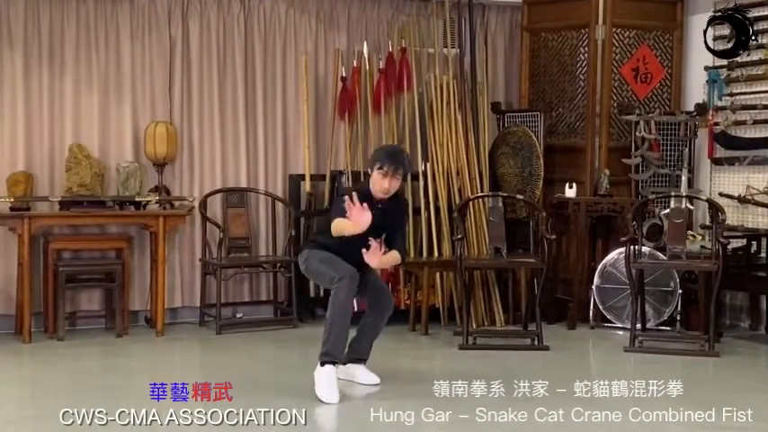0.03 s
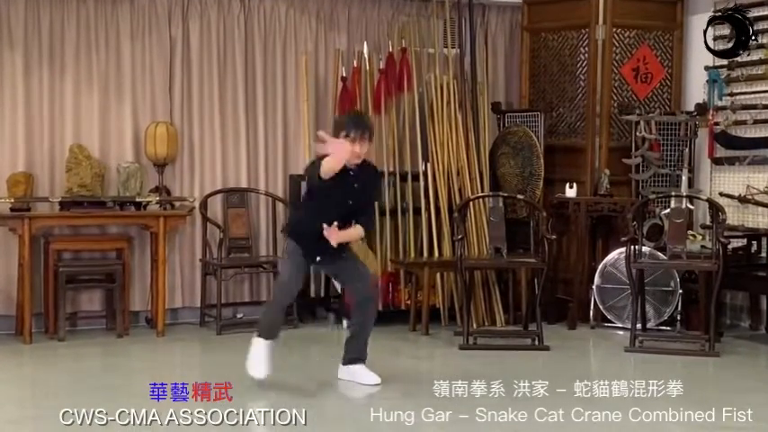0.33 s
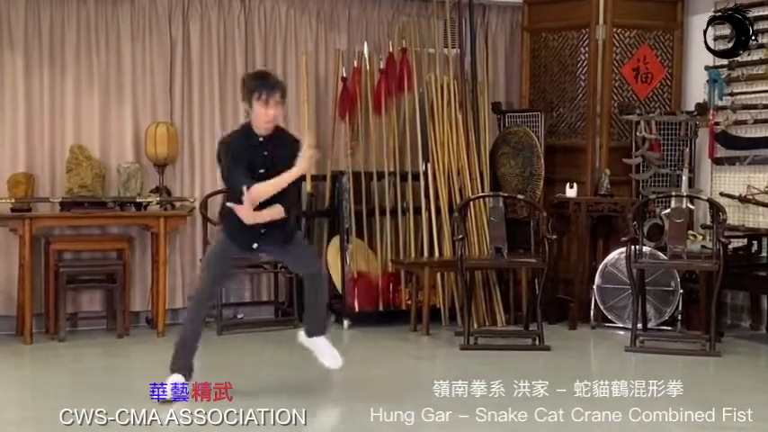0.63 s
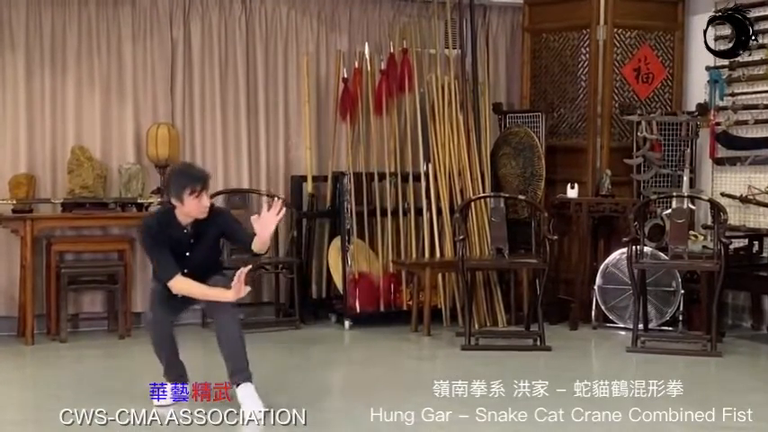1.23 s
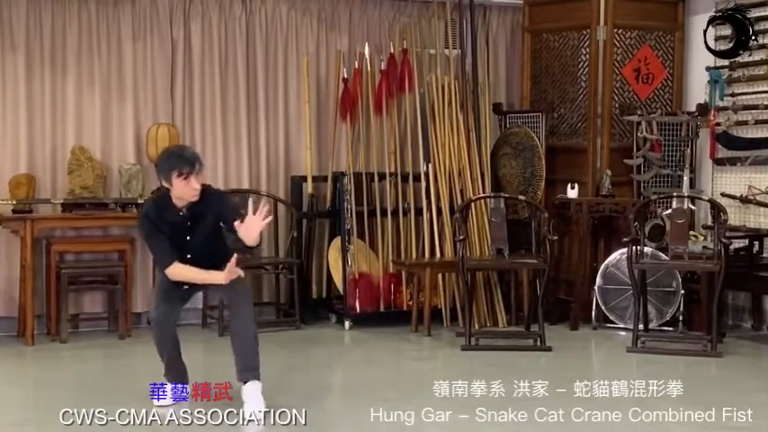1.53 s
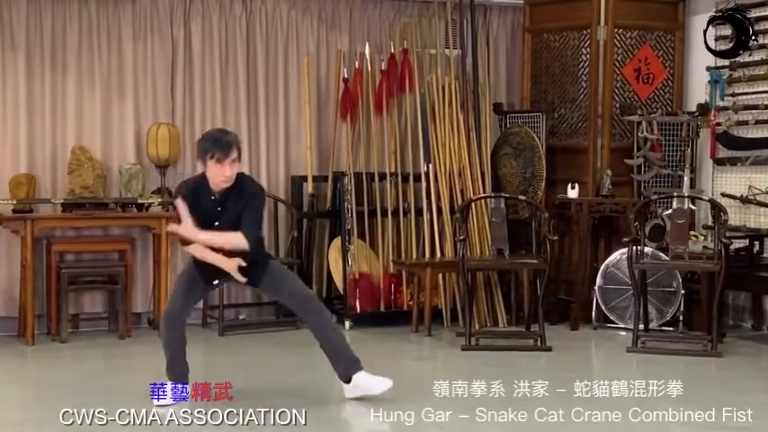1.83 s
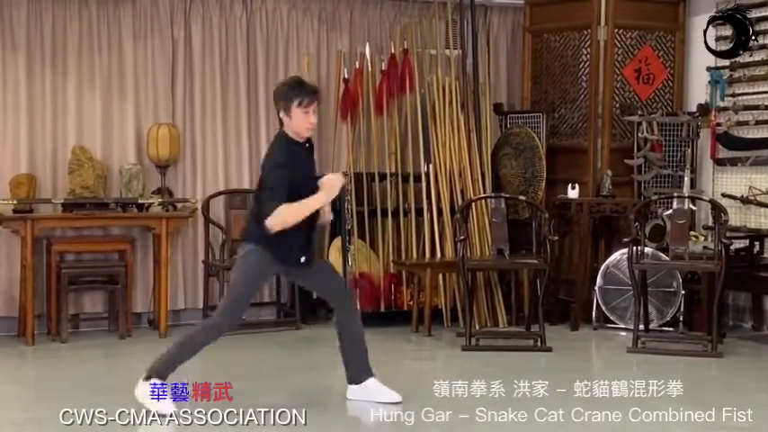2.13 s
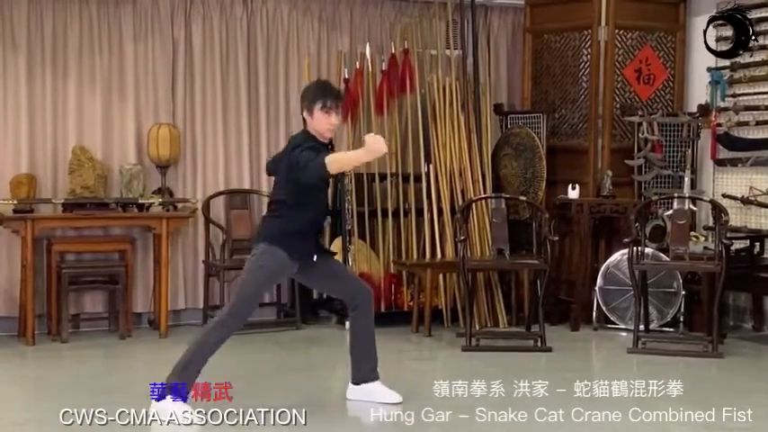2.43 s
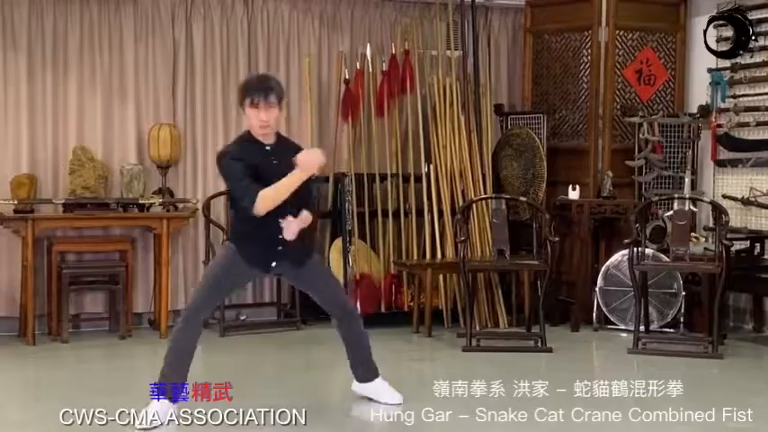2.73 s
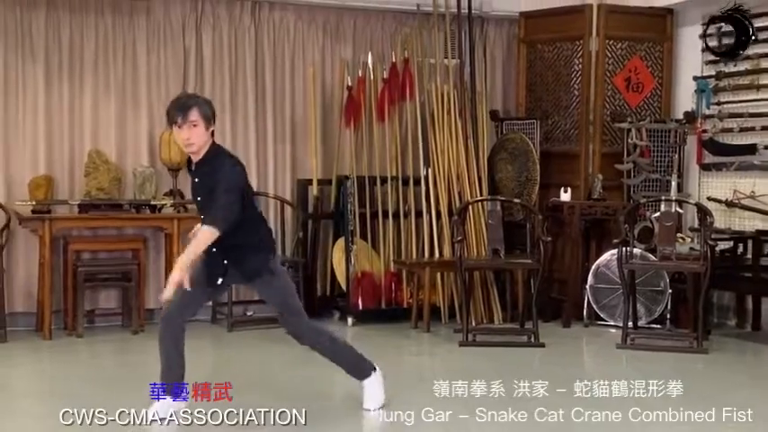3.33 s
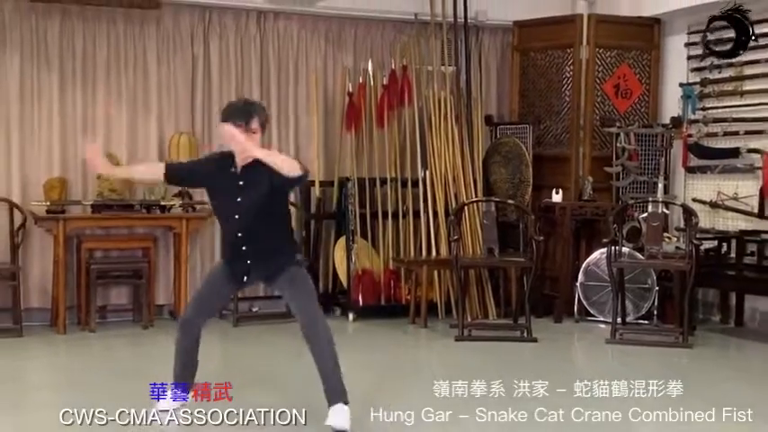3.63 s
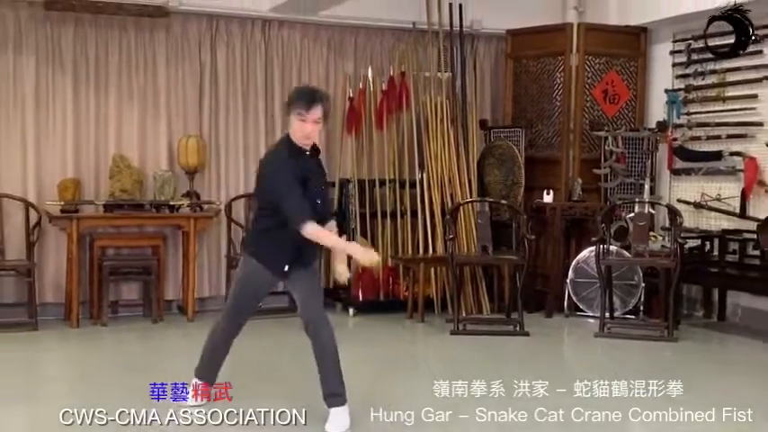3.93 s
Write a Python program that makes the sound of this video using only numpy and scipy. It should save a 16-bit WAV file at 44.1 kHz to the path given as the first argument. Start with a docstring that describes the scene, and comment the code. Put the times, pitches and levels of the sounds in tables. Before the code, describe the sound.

Two heavy stomps ring through a hall amid soft shoe scuffs and sleeve swishes.

```python
"""Martial arts stances in a live hall

Soft shoes tap, scuff and shuffle on a hard floor a few metres away; sleeves swish.
Two flat-footed stomps, each a cluster of sharp hits, ring floor and room.
Ventilation hums underneath. Shortly before the second stomp the whole sound steps up in level."""
import sys
import numpy as np
from scipy import signal
from scipy.fft import rfft, irfft
from scipy.io import wavfile

SR = 44100
rng = np.random.default_rng(int(sys.argv[2]) if len(sys.argv) > 2 else 0)


def output_pcm(signal):
    """Save a mono or channel-first signal as 16-bit PCM at the path in sys.argv[1].

    Samples are clipped to [-1, 1] before scaling.
    """
    pcm = np.clip(np.atleast_2d(signal).T, -1, 1) * 32767
    wavfile.write(sys.argv[1], SR, np.round(pcm).astype(np.int16))


N = 176400
T = np.arange(N) / SR
HZ = np.maximum(np.arange(N // 2 + 1) * SR / N, 1)

# rushing air (frequency [Hz], level [dB])
AIR_SPECTRUM = [(20, -51), (32, -21), (45, 7), (65, -3.5), (90, 3.5), (150, 1.5), (280, 0.5), (420, -9),
                (750, -11.5), (1100, -18.5), (1500, -23.5), (2500, -28), (5700, -34), (6600, -43),
                (15500, -55.5)]
# hum, then fan tones (frequency [Hz], level [dB], waver [dB])
FAN_TONES = [(68.55, -53.5, 0.7), (101.8, -67, 0.5), (147, -69, 2.5), (670.6, -76, 1.5), (786, -74, 0.5)]
# swell of the hum (time [s], gain [dB])
HUM_ENVELOPE = [(0, -4), (.13, 2.5), (.45, -6.5), (.76, 3.5), (1.03, 1.5), (1.31, -7), (1.55, -0.5),
                (1.8, 2), (2.25, 0.5), (2.62, 0.5), (2.9, 1), (3.28, -2.5), (3.6, -1.5), (3.88, 1.5),
                (4, -4)]
# sleeve swishes (peak time [s], rise [s], fall [s], level [dB])
SLEEVE_MOVES = [(.43, 0.15, .08, -80), (.7, 0.11, 0.11, -80), (1.7, 0.027, .05, -77),
                (1.85, 0.086, 0.16, -78), (2.53, 0.13, 0.054, -81), (2.665, 0.12, 0.033, -69.5),
                (3.17, 0.21, 0.073, -83.5), (3.69, 0.069, 0.095, -67.5), (3.79, 0.066, 0.062, -70)]
# cloth friction (frequency [Hz], level [dB])
CLOTH_SPECTRUM = [(100, -10), (500, -6), (1500, -2), (3000, 2.5), (5000, 1), (7000, -1), (9000, -5.5),
                  (11000, -2), (15500, -16)]
# sole scuffs (peak time [s], rise [s], fall [s], level [dB], rasp [Hz])
SOLE_SLIDES = [(.41, 0.042, 0.014, -68, 2600), (.492, 0.016, 0.02, -63, 1400),
               (1.82, 0.018, 0.033, -70, 2700), (2.585, 0.016, 0.024, -57.5, 3130),
               (2.67, 0.065, 0.026, -60.5, 1590), (2.779, 0.048, 0.032, -46.5, 2000),
               (3.09, 0.072, 0.067, -69, 1530), (3.445, 0.0088, .02, -66.5, 2030),
               (3.58, 0.03, 0.035, -73, 1200), (3.76, 0.062, 0.097, -64.5, 1440)]
# sole friction (frequency [Hz], level [dB])
SCUFF_SPECTRUM = [(100, 12), (400, 7), (1000, 3), (1400, 9.5), (3000, 2), (4500, -3.5), (8000, -31),
                  (15000, -40)]
# shuffles (peak time [s], rise [s], fall [s], level [dB])
WEIGHT_SHIFTS = [(.5, 0.089, 0.034, -56.5), (.88, 0.13, 0.1, -66), (1.8, 0.19, 0.083, -61),
                 (2.5, 0.12, 0.082, -55), (3.69, 0.16, 0.13, -58.5)]
# dull friction (frequency [Hz], level [dB])
SHUFFLE_SPECTRUM = [(50, -8), (120, 0.5), (260, 5.5), (420, -4), (700, -1), (1200, -14), (2000, -19.5),
                    (5000, -42), (15500, -52)]
# light steps (time [s], level [dB], bass [dB], treble [dB])
FOOTFALLS = [(0.477, -22, 8, -3), (.775, -23, -4, -6.5), (1.662, -25, -8, -4.5), (1.705, -21, 6, -17),
             (1.802, -18, -1.5, -6), (2.925, -17, 11.5, -24), (3.434, -23.5, 5.5, -3.5),
             (3.527, -21.5, -9, -5.5)]
# soft tap (frequency [Hz], level [dB])
TAP_SPECTRUM = [(40, -18.5), (120, 1), (280, 4.5), (500, -0.5), (900, -6.5), (1400, -8.5), (2100, -16),
                (3200, -26.5), (5000, -28), (9000, -39), (15500, -39)]
# sharp hits within the stomps: sole impacts, their quick echoes and a closing snap
# (time [s], level [dB], thump [dB], clap [Hz], clap [dB], crack [dB], slap [dB], snap [dB])
STOMP_HITS = [(1.9884, 2, -0.5, 1220, 6, -7.5, 3, 7.5), (2.0003, -11, -2, 3040, 7, 4.5, -1, 3),
              (2.7187, -16, 3.5, 960, 2, 7, 0, -6), (2.7333, -4, -2, 990, 5.5, -1, 6.5, -14),
              (2.7531, -16, 4.5, 900, 3, 1, 5, -18), (2.7654, -9.5, 8, 670, 2.5, 2, -6, -17),
              (2.791, -25, 7, 2400, 7.5, 13, 0.5, -12)]
# base spectrum of a hit (frequency [Hz], level [dB])
STOMP_SPECTRUM = [(30, -28), (60, -9.5), (120, 2), (220, -0.5), (480, -1), (750, -3.5), (1100, -9),
                  (1480, -16), (2000, -14.5), (2600, -16.5), (3400, -24), (4500, -28.5), (6500, -32),
                  (9000, -37), (15500, -42.5)]
# stomp landings (time [s])
LANDING_TIMES_S = [1.99, 2.736]
# floor and room modes (frequency [Hz], T60 [s], first landing [dB], second landing [dB])
ROOM_MODES = [(117.9, 0.87, 2, -2), (145, 0.45, -13, -19), (197, 0.97, -23, -1), (219.3, 0.53, -12, -0.5),
              (242, 1, -2, -23), (359, 0.51, -23, -2), (429, 0.31, -28, -5), (487, 0.33, -2, -3),
              (577, 0.64, -10, -7), (624, 1, -5, -7.5), (765, 0.28, -23, -13), (889, 0.45, -9, -6),
              (990, 0.38, -24, -6.5), (1150, 0.74, -3, -14)]
# first reflections (left delay [s], right delay [s], gain [dB])
REFLECTIONS = [(.0051, .0053, -6), (.0098, .0108, -3.5), (0.012, .0124, -13.5), (0.027, 0.036, -24)]
# hall decay (frequency [Hz], T60 [s])
HALL_DECAY = [(60, 1.2), (170, 1.05), (400, 0.86), (1000, 0.92), (6000, 0.93), (14000, 0.51)]
# diffuse field (frequency [Hz], left-right coherence [0-1])
COHERENCE = [(70, 0.95), (170, 0.87), (350, 0.71), (700, 0), (12000, 0.029)]
# stereo balance (frequency [Hz], left minus right [dB])
STEREO_TILT = [(60, -0.5), (140, -2), (300, -0.8), (600, -0.5), (1100, 1.8), (2200, 1), (4500, 4.5),
               (8000, 0), (14000, 0)]

IMPACT_DB, HALL_BUILD_S = 15, 0.0017
SIDES = np.array([[1], [-1]])  # left, right


def undb(db):
    """Decibels to gain."""
    return 10 ** (np.asarray(db) / 20)


def curve(points, hz=HZ):
    """Interpolate (frequency [Hz], value) points over log frequency."""
    points_hz, values = np.array(points).T
    return np.interp(np.log(hz), np.log(points_hz), values)


def above(hz):
    """Smooth shelf: 0 below hz, 1 above."""
    return 1 - 1 / (1 + (HZ / hz) ** 2)


def bump(hz, log_width):
    """Bell of height 1 over log frequency."""
    return np.exp(-(np.log(HZ / hz) / log_width) ** 2)


def decay(t60_s):
    """Envelope falling 60 dB in t60_s."""
    return np.exp(-np.log(1000) * T / t60_s)


def wander(rate_hz):
    """Smooth random drift, unit spread."""
    drift = irfft(rfft(rng.standard_normal(N)) / (1 + (HZ / rate_hz) ** 2) ** 2, N)
    return drift / drift.std()


def pulse(spectrum_db):
    """Minimum-phase pulse with the given spectrum."""
    cepstrum = irfft(np.log(undb(spectrum_db)), N)
    cepstrum[1:N // 2] *= 2
    cepstrum[N // 2 + 1:] = 0
    return irfft(np.exp(rfft(cepstrum)), N)


def add(out, start_s, sound):
    """Mix sound into out at start_s."""
    i = int(start_s * SR)
    out[i:] += sound[:N - i]


def diffuse():
    """Stereo spectra of noise from all round: alike in the bass, unrelated in the treble."""
    coherence = curve(COHERENCE)
    mid, side = rfft(rng.standard_normal((2, N)))
    return mid * np.sqrt((1 + coherence) / 2) + SIDES * side * np.sqrt((1 - coherence) / 2)


def ventilation(air_db=-55.5, flicker_db=0.36, left_lag_s=0.00034, waver_hz=14):
    """Swelling hum and faint fan tones over rushing air, part of it straight from the right."""
    lag_s = np.array([[left_lag_s], [0]])
    direct = rfft(rng.standard_normal(N)) * np.exp(-2j * np.pi * HZ * lag_s)
    air = irfft((diffuse() + undb(-14) * direct) * undb(curve(AIR_SPECTRUM)), N)
    air *= undb(air_db + flicker_db * wander(rate_hz=11)) / air.std()
    tones = []
    for hz, db, waver_db in FAN_TONES:
        amplitude = np.sqrt(2) * undb(db + waver_db * wander(waver_hz))
        tones.append(amplitude * np.sin(2 * np.pi * hz * T + 0.44 * wander(waver_hz)))
    swell = undb(np.interp(T, *np.array(HUM_ENVELOPE).T))
    return air + tones[0] * swell + sum(tones[1:])


def friction(moves, spectrum_db, rough_db=2, rough_hz=51):
    """Grainy rubbing noise that swells and fades with each move."""
    power = 0
    for peak_s, rise_s, fall_s, db in moves:
        width_s = np.where(T < peak_s, rise_s, fall_s)
        power += (undb(db) * np.exp(-((T - peak_s) / width_s) ** 2)) ** 2
    noise = irfft(rfft(rng.standard_normal(N)) * undb(spectrum_db), N)
    grain = undb(rough_db * wander(rough_hz))
    return np.sqrt(power) * grain * noise / noise.std()


def swishes():
    """Sleeve cloth rubs with a bright hiss."""
    return friction(SLEEVE_MOVES, curve(CLOTH_SPECTRUM))


def scuffs(rasp_db=5.5):
    """Each slide of a sole rasps at its own pitch."""
    return sum(friction([move], curve(SCUFF_SPECTRUM) + rasp_db * bump(rasp_hz, log_width=0.28))
               for *move, rasp_hz in SOLE_SLIDES)


def shuffles():
    """Soles rub dully as the weight shifts."""
    return friction(WEIGHT_SHIFTS, curve(SHUFFLE_SPECTRUM))


def steps(grit_share=0.9, grit_decay_s=0.009):
    """Soft taps spread by tiny grit contacts under the sole; weight on the heel adds bass."""
    out = np.zeros(N)
    for start_s, db, bass_db, treble_db in FOOTFALLS:
        tap = pulse(curve(TAP_SPECTRUM) + bass_db * (1 - above(200)) + treble_db * above(510))
        grit = np.exp(-T / grit_decay_s) * rng.standard_normal(N)
        grit /= np.linalg.norm(grit)
        contact = np.sqrt(1 - grit_share) + np.sqrt(grit_share) * rfft(grit)
        add(out, start_s, undb(db + IMPACT_DB) * irfft(rfft(tap) * contact, N))
    return floor_flex(out)


def floor_flex(impacts, centre_hz=500, width_hz=710):
    """The floor gives and swings back: an all-pass that slightly delays the low mids."""
    s = 1j * HZ
    poles = s * s + width_hz * s + centre_hz ** 2
    return -irfft(rfft(impacts) * np.conj(poles) / poles, N)


def stomps():
    """Sole impacts, their quick echoes and a closing snap, each a sharp pulse of its own colour."""
    out = np.zeros(N)
    for start_s, db, thump_db, clap_hz, clap_db, crack_db, slap_db, snap_db in STOMP_HITS:
        spectrum_db = (curve(STOMP_SPECTRUM)
                       + thump_db * (1 - above(190))
                       + clap_db * bump(clap_hz, log_width=0.2)
                       + crack_db * above(2150)
                       + slap_db * bump(5240, log_width=0.55)
                       + snap_db * above(11000))
        add(out, start_s, undb(db + IMPACT_DB) * pulse(spectrum_db))
    return floor_flex(out)


def ringing(gain_db=-41.5):
    """Both landings ring the same floor and room modes, weighted by where the foot falls."""
    out = np.zeros(N)
    for hz, t60_s, *levels_db in ROOM_MODES:
        envelope = decay(t60_s) * (1 - np.exp(-T / HALL_BUILD_S))
        for start_s, db in zip(LANDING_TIMES_S, levels_db):
            mode = np.sin(2 * np.pi * (hz * T + rng.random()))
            add(out, start_s, undb(db + gain_db) * envelope * mode)
    return out


def early_response(gain_db=-9.5, treble_db=-1.5):
    """Direct path and first hard reflections, slightly dull off the microphone axis."""
    taps = np.zeros((2, N))
    taps[:, 0] = 1
    for left_s, right_s, db in REFLECTIONS:
        taps[0, int(left_s * SR)] += undb(db)
        taps[1, int(right_s * SR)] += undb(db)
    off_axis = pulse(gain_db + treble_db * above(4100))
    return irfft(rfft(taps) * rfft(off_axis), N)


def hall(sound, tail_db=-0.15, scatter_db=1, scatter_s=0.0079, lowest_band_hz=31.25):
    """Early sound, scatter off the furniture, then a diffuse tail that dies sooner in the treble."""
    field, tail = diffuse(), np.zeros((2, N))
    octaves = np.clip(np.log2(HZ / lowest_band_hz), 0, 9)
    for octave in range(10):
        band = irfft(field * np.maximum(1 - abs(octaves - octave), 0), N)
        tail += band * decay(curve(HALL_DECAY, lowest_band_hz * 2 ** octave))
    tail *= 1 - np.exp(-T / HALL_BUILD_S)
    tail *= 1 + undb(scatter_db) * np.exp(-T / scatter_s)
    tail *= undb(tail_db) / np.sqrt(np.sum(tail ** 2) / 2)
    response = early_response() + tail
    return signal.fftconvolve(sound[None], response[:, :N // 2], axes=1)[:, :N]


def scene():
    """Feet and sleeves in the hall, over ventilation; treble leans left, bass right."""
    movement = stomps() + steps() + scuffs() + swishes() + shuffles()
    mix = hall(movement) + ringing() + ventilation()
    balance = undb(SIDES * curve(STEREO_TILT) / 2)
    return irfft(rfft(mix) * balance, N)


def record(dry):
    """The level steps up once and holds; the very top is cut."""
    step_at_s, rise_s, step_db, cutoff_hz = 2.392, 0.008, 10, 15800
    gain = undb(step_db * np.clip((T - step_at_s) / rise_s, 0, 1))
    lowpass = signal.ellip(8, 0.2, 70, cutoff_hz, fs=SR, output="sos")
    return signal.sosfilt(lowpass, dry * gain)


dry = scene()
out = record(dry)
output_pcm(out)
```